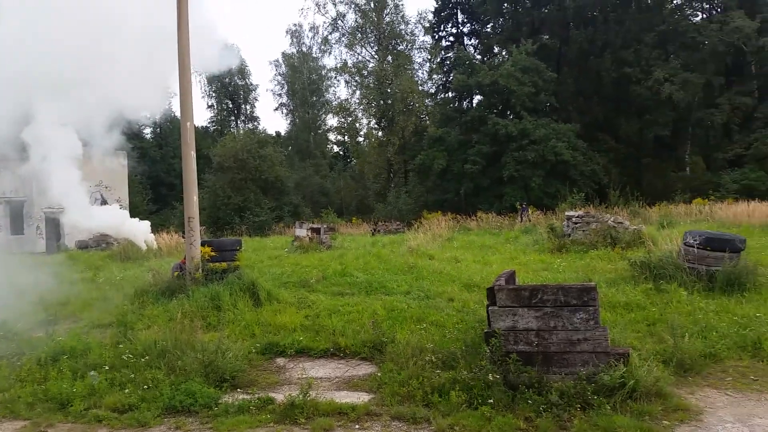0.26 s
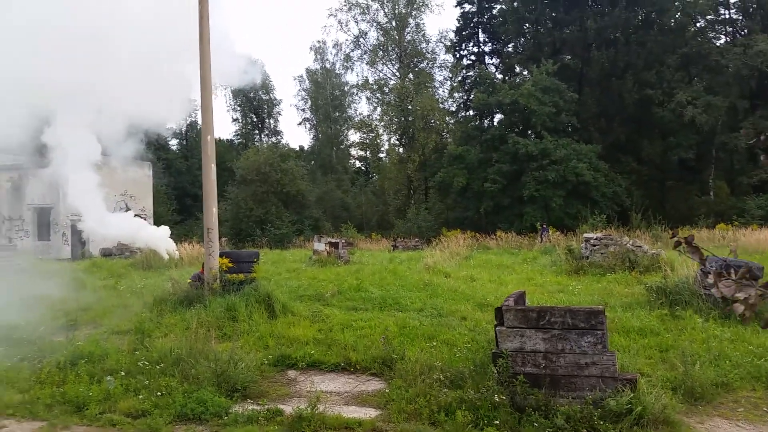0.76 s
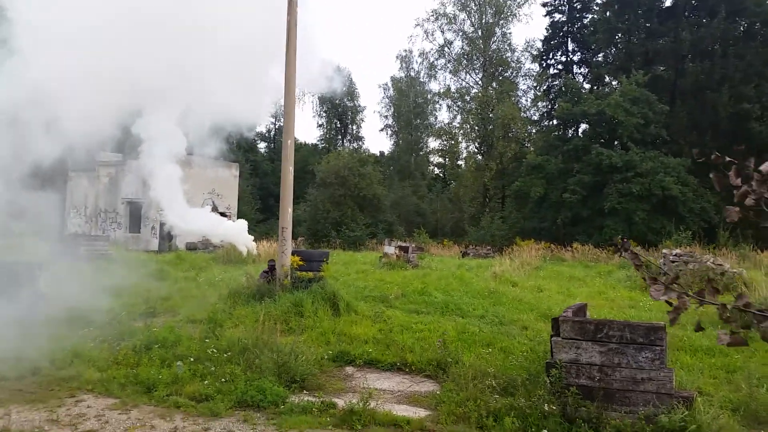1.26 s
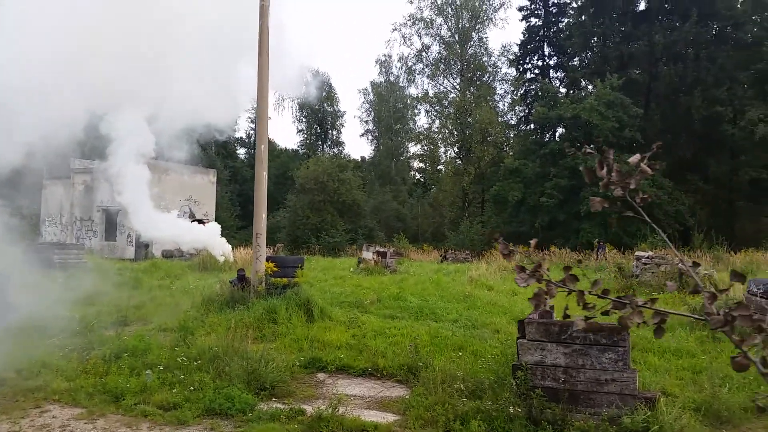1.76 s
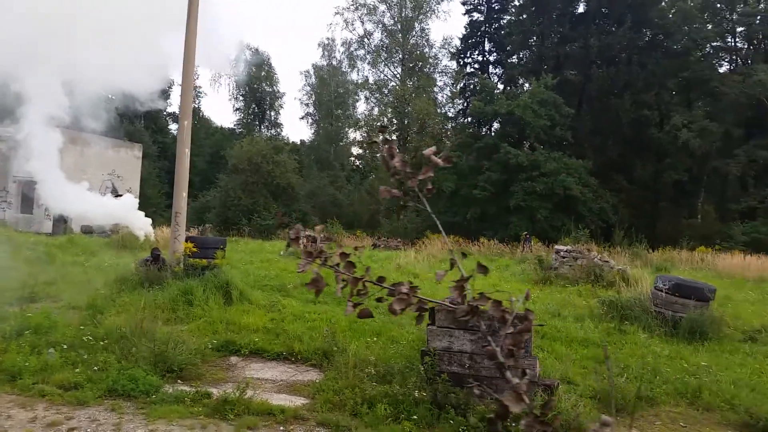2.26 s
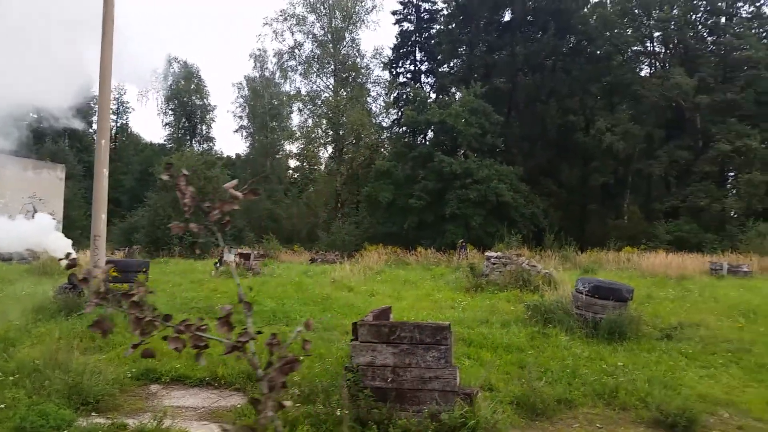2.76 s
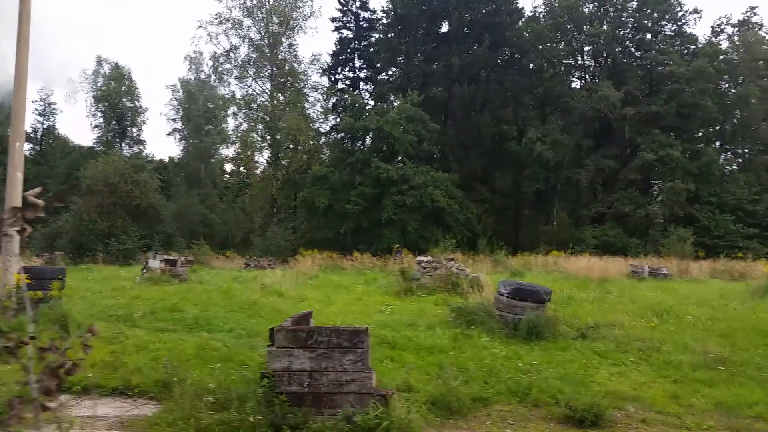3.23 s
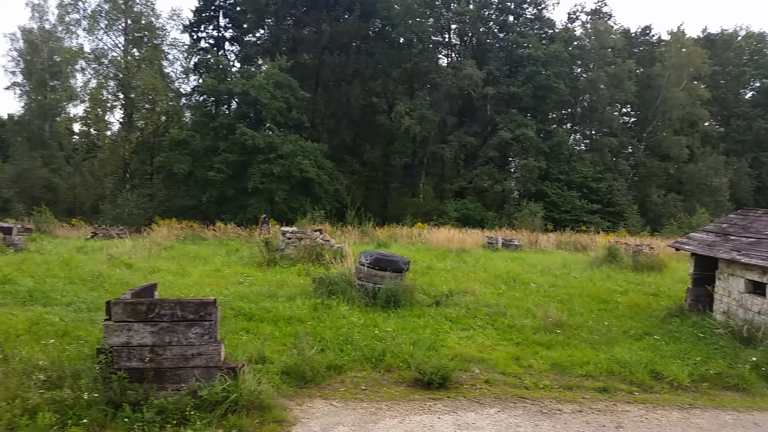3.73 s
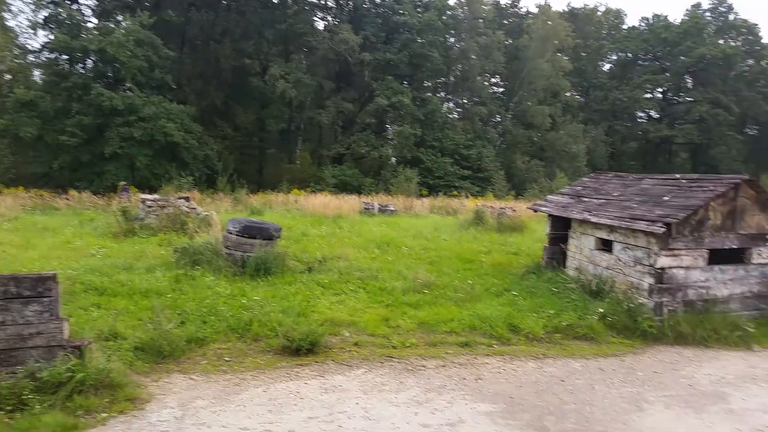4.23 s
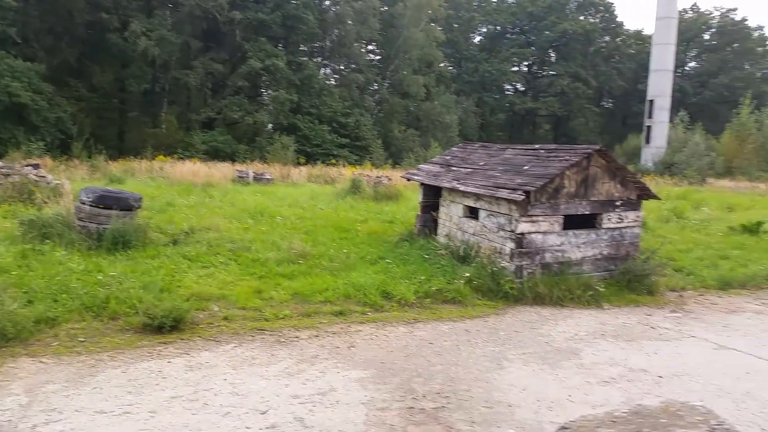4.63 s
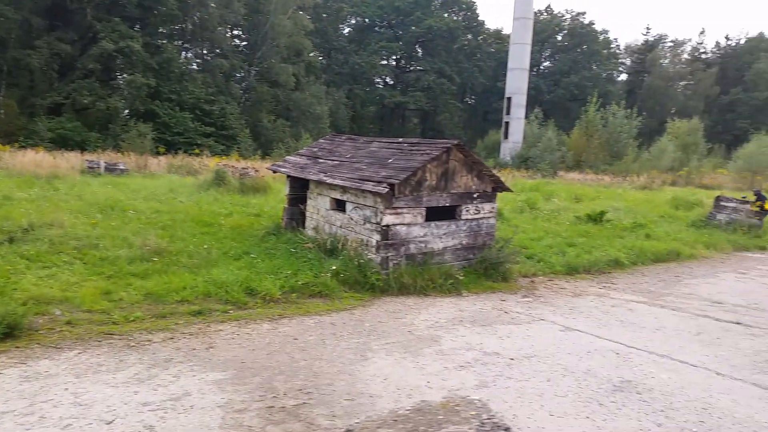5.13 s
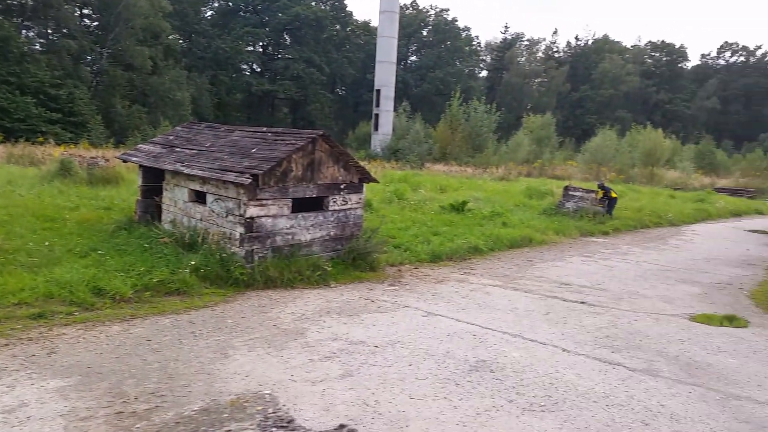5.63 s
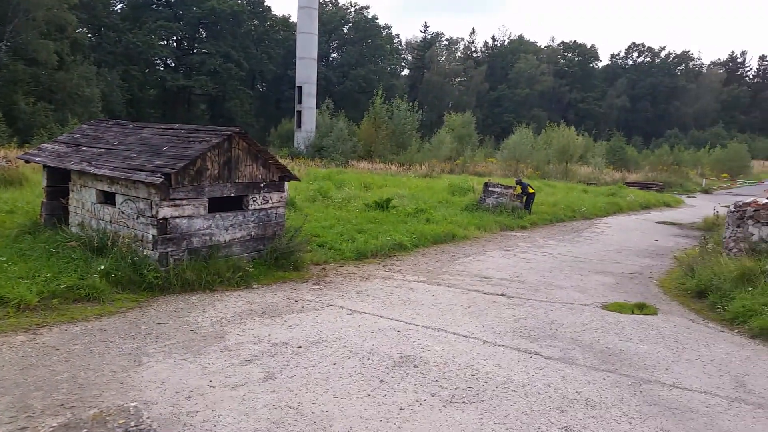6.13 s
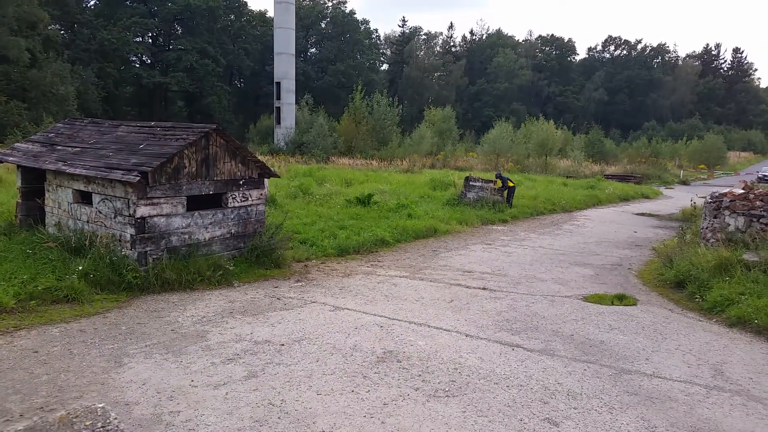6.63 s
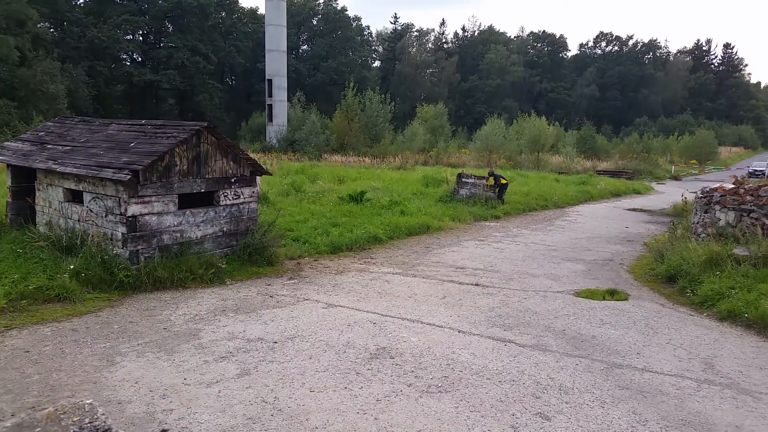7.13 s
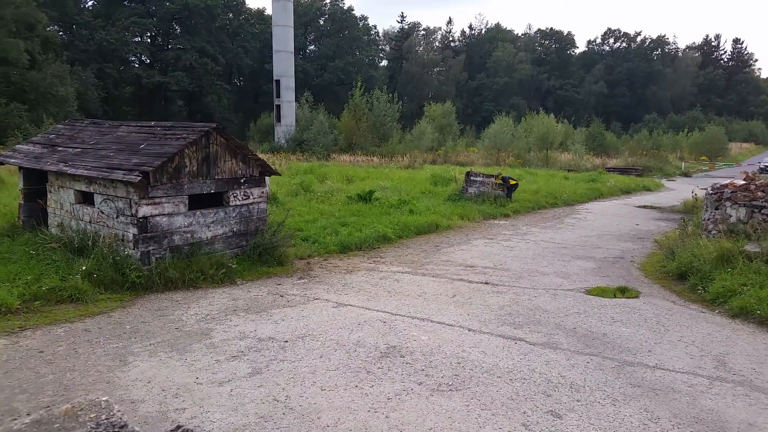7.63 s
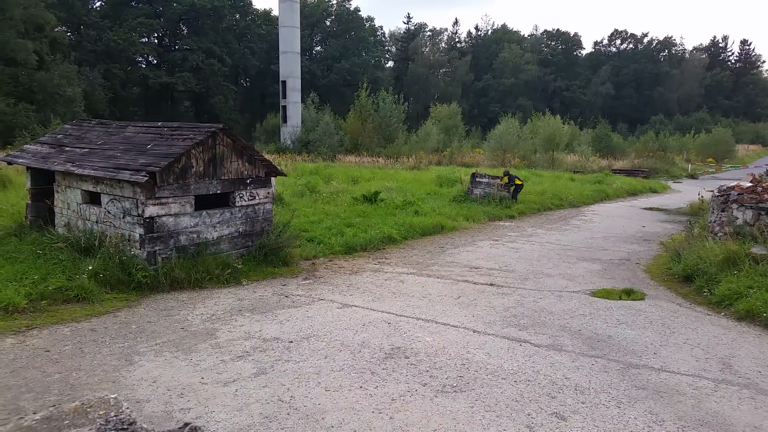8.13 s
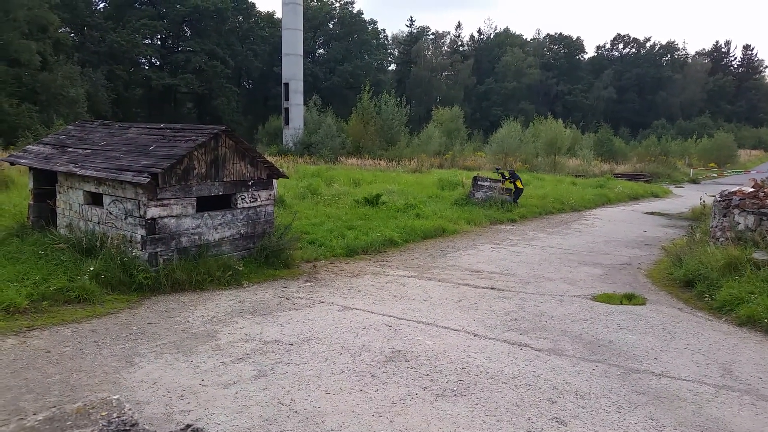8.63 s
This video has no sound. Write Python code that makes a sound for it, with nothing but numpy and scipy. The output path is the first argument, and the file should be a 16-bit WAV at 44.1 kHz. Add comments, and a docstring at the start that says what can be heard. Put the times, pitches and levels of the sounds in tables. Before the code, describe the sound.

Two paintball markers trade irregular sharp pops across an open grassy field, each echoing off huts and forest, over faint wind and hopper rattles.

```python
"""A grassy field ringed by forest, with huts on it: two paintball markers trade shots as a two-port
microphone pans across, so that the shots drift from one port to the other.
A shot is a tiny trigger click, a low push of air, a pop from the barrel and a spit of shaped noise for
the gas; huts and trees throw it back as delayed copies and decaying noise. Between shots, knocks ring
a hopper's modes, twigs tick, feet bump, grass rustles and a light wind rumbles, all from noise and tones."""
import sys
import numpy as np
from scipy import signal
from scipy.fft import rfft, irfft, next_fast_len
from scipy.io import wavfile
from scipy.ndimage import uniform_filter1d

SR = 44100
rng = np.random.default_rng(int(sys.argv[2]) if len(sys.argv) > 2 else 0)


def log_audio(samples):
    """Write samples as a 16-bit WAV file to the path given in sys.argv[1]."""
    # one column per channel
    frames = np.atleast_2d(samples).T
    # limit to full scale, then quantise
    limited = np.clip(frames, -1, 1)
    pcm = np.round(limited * 32767).astype(np.int16)
    wavfile.write(sys.argv[1], SR, pcm)


N = 391608

# Levels are those ahead of the port shading and the microphone's response; spectra are relative.
# low rumble, whose level dips briefly around 7.5 to 8 s: (time [s], level [dB])
RUMBLE_LEVEL = [(0, -49), (.9, -54.5), (2.3, -50), (5.8, -56.5), (7.1, -55), (7.55, -67), (7.98, -65),
                (8.3, -51.5), (8.88, -49.5)]
# background between shots: (time [s], rustle level [dB], murmur level [dB])
BACKGROUND_LEVEL = [(0, -55.5, -48), (.3, -66, -60), (.95, -71, -68), (1.5, -56, -54), (2.1, -61, -59.5),
                    (3.9, -69, -55), (5.3, -71, -72.5), (5.9, -91.5, -71), (7.2, -97, -70.5),
                    (7.6, -95.5, -89), (7.97, -93, -86), (8.3, -75.5, -61)]
# spectra of the wind, the leaves and the far trees: (frequency [Hz], density [dB per Hz])
WIND_SPECTRUM = [(15, -6.5), (35, -7.5), (65, 4.5), (115, 1), (190, -8.5), (300, -14), (600, -24),
                 (2000, -61.5)]
LEAF_SPECTRUM = [(800, -34), (2200, 0.5), (3300, -3.5), (5500, 0), (7050, 6), (8000, -1), (8700, 0),
                 (10500, -2), (12500, -2.5), (15000, -5.5)]
FAR_TREE_SPECTRUM = [(80, -7), (250, 3.5), (430, 4), (650, 5), (1200, -0.5), (2100, -3.5), (2900, -30),
                     (6000, -42.5)]
# one grain of dry stems crackling: (frequency [Hz], level [dB])
CRACKLE_SPECTRUM = [(300, -22), (750, -2.5), (1400, 0.5), (2200, -6.5), (3200, -10), (9000, -32)]
STEMS_RE_MURMUR_DB = -8.5

# small ticks and scuffs of gear and twigs:
# (time [s], level [dB], fade [s], brightness above 1 kHz [dB per octave])
TICKS = [(0.3223, -54, .002, 1), (1.2105, -52, .0022, 1), (1.3565, -36.5, .0025, 5),
         (2.673, -50, .0027, -2), (2.886, -32.5, .006, -2), (3.844, -47, .008, -3.5),
         (4.116, -54, .0022, -2), (5.274, -41, .009, 2), (5.686, -42.5, 0.0019, -0.5)]
# (frequency [Hz], density [dB per Hz])
TICK_SPECTRUM = [(300, -16.5), (1200, 0), (2100, 3), (3100, -8.5), (4500, -3.5), (5700, -3), (7050, 0.5),
                 (9000, -7), (15000, -11.5)]
# soft low bumps of footfalls: (time [s], peak level [dB])
FOOTFALLS = [(0.909, -45), (4.891, -41), (5.175, -30.5), (5.34, -38.5), (6.333, -38.5), (6.384, -41),
             (6.441, -40.5), (7.596, -44)]
# loose balls tumbling in a hopper, a length of 0 being one knock:
# (start [s], length [s], knock level before its random spread [dB], nominal pitch [Hz])
TUMBLES = [(0.818, 0, -49.5, 1260), (2.868, .031, -29.5, 1530), (2.931, 0, -33, 1800),
           (2.956, .034, -29, 1210), (3.029, 0, -42.5, 1000), (3.058, .025, -45, 1600),
           (3.902, 0, -39.5, 1160), (3.949, .027, -40.5, 1250), (4.022, 0, -31.5, 1380),
           (4.036, 0, -41, 1400), (4.088, 0, -40.5, 1560), (5.515, 0, -39.5, 1540), (6.794, 0, -34, 1410),
           (7.73, 0, -76, 1300), (8.009, 0, -52, 1324), (8.562, 0, -43.5, 1140)]
KNOCK_GAP_S, KNOCK_SPREAD_DB = 0.012, 0.5  # within a tumble
# modes of the hopper shell for a 1400 Hz knock, before random detuning:
# (frequency [Hz], relative level [dB], time to fall 60 dB [s])
HOPPER_MODES = [(810, -6.5, 0.013), (1124, -3, 0.01), (1370, 25, 0.009), (1690, 14.5, 0.026),
                (2450, -1, 0.0093)]
# what follows a knock: (frequency [Hz], density [dB per Hz]) and (frequency [Hz], time to fall 60 dB [s])
KNOCK_SCATTER = [(300, -16.5), (1300, 12.5), (2200, -5.5), (4000, -27.5), (12000, -37)]
KNOCK_T60 = [(300, 0.084), (8000, 0.082)]

# the close marker: (time [s], push [dB], body [dB], pop [dB], gas [dB], gas brightness above 1 kHz
# [dB per octave], near scatter [dB], boom [dB], forest echo [dB], leaf echo [dB], left port lag [ms])
SPITTING_SHOTS = [(1.5445, -28, -29, -17.5, -25, -0.5, -31, -46, -30.5, -46, 0.45),
                  (2.1933, -26, -31.5, -22.5, -26, -4, -33, -46, -33, -48.5, 0.41),
                  (2.772, -25, -29.5, -20.5, -27, -1.5, -32.5, -43, -33.5, -53, 0.43),
                  (3.367, -29.5, -39, -21.5, -25.5, -3, -32, -60, -31.5, -63, 0.39),
                  (4.2182, -41, -35, -25, -21.5, -3, -31.5, -52, -35, -58, 0.35),
                  (4.425, -34.5, -43, -49, -28, 1, -44, -56, -37, -65.5, -0.35),
                  (6.761, -35.5, -31.5, -55.5, -34.5, -4.5, -41.5, -54.5, -51, -71.5, -0.43),
                  (7.205, -48, -35.5, -47, -35, -4, -48, -57.5, -69.5, -88, -0.44),
                  (8.127, -32, -35.5, -55, -43, -3.5, -47, -49.5, -48.5, -65.5, -0.45),
                  (8.611, -29.5, -27.5, -54, -32, -4.5, -41, -43, -43, -65.5, -0.43)]
# the second marker: (time [s], push [dB], pop [dB], gas [dB], gas brightness above 1 kHz
# [dB per octave], near scatter [dB], boom [dB], forest echo [dB], leaf echo [dB], left port lag [ms])
BARKING_SHOTS = [(4.1578, -30.5, -18, -25, -0.5, -27.5, -40, -42, -61, 0.19),
                 (4.5604, -40, -19, -19.5, -0.5, -26.5, -44, -39.5, -68, 0.09),
                 (4.983, -35.5, -23, -25, -1, -30.5, -44, -43.5, -67, 0.0),
                 (5.4181, -36, -23.5, -24.5, -2, -34, -46.5, -45.5, -73, -0.1),
                 (6.007, -30.5, -22, -33, -1.5, -37, -38, -60, -68, -0.172),
                 (6.5586, -36, -22.5, -31, -4, -37.5, -42, -60, -69, -0.36),
                 (7.023, -31, -20.5, -34.5, 2, -34.5, -35.5, -58, -76, -0.403)]
# spectra of the gas jets: (frequency [Hz], density [dB per Hz])
SPITTING_GAS = [(400, -8.5), (900, -9), (1500, 0.5), (2250, -3), (3100, -9), (4500, -4), (5800, -9.5),
                (7100, -4.5), (9500, -7), (12500, -14), (15000, -6.5)]
BARKING_GAS = [(400, -17), (900, -1.5), (1350, -2.5), (2100, -6.5), (3000, -12.5), (4800, -7.5),
               (5900, -13.5), (7100, -9), (9500, -16), (15000, -21.5)]
# overtones of the second marker's barrel: (frequency [Hz], level against the pop [dB])
BARREL_OVERTONES = [(830, -7), (1350, -7), (1680, -24)]
# spectra of the scatter from huts and bushes, the forest echo and the low roll between the buildings:
# (frequency [Hz], density [dB per Hz])
SPITTING_SCATTER = [(40, -4.5), (100, 21), (200, -3), (330, 10), (600, 4.5), (1100, 4.5), (2100, 0.5),
                    (3100, -3), (5500, -4.5), (7100, -2.5), (9500, -6), (14500, -10)]
BARKING_SCATTER = [(40, -2), (110, 8), (180, 15), (330, 7), (520, 11.5), (760, 1), (950, 9.5), (1300, 2.5),
                   (1700, 4), (3100, -4.5), (5500, -5.5), (7200, -6.5), (9500, -8), (14500, -12)]
FOREST_SPECTRUM = [(40, -16.5), (105, 8.5), (240, -2), (430, 3), (680, 6.5), (1300, 2.5), (2100, 2),
                   (3100, -3.5), (5600, -2.5), (7000, -3), (9600, -4.5), (12600, -17.5), (15000, -22.5)]
BOOM_SPECTRUM = [(40, -27), (100, -8), (175, -3.5), (290, -6.5), (400, -8), (800, -33.5), (3000, -74)]
# how long these ring: (frequency [Hz], time to fall 60 dB [s])
SCATTER_T60 = [(100, 0.4), (250, .45), (600, 0.27), (2000, 0.37), (7000, 0.39), (14000, 0.19)]
FOREST_T60 = [(100, 0.73), (600, 0.99), (2000, 1.127), (7000, 0.69), (14000, 0.3)]
BOOM_T60 = [(150, 0.76), (400, 0.12)]
# planks returning the second marker's pop: (delay before a small jitter [s], level [dB])
PLANK_ECHOES = [(.0165, -16.5), (.0232, -7.5), (.0305, -13.5), (.04, -21), (.061, -28)]
WALL_S, WALL_DB = .019, -3.5  # a building's echo of the second marker's push
# the tree line answers every shot: leaves return its hiss, trunks its low push as a dull roll
TREE_LINE_S, TREE_SWELL_S = 0.15, 0.11  # delay of the echo's crest, and time constant of its swell
LEAF_FALL_DB_PER_S, ROLL_FALL_DB_PER_S = 76, 51
ROLL_RE_PUSH_DB = -25.5

# resonances of the microphone's ducts: (frequency [Hz], width [Hz], level [dB])
PORT_MODES = [(2150, 280, 3.5), (3730, 220, 4), (7050, 380, 5), (8680, 260, 4), (11800, 600, 3)]
# colour of the two ports: (frequency [Hz], left minus right [dB])
PORT_BALANCE = [(60, 1.3), (250, 1.5), (900, 2), (2000, 2.5), (4500, -3.5), (9000, 0)]
PORTS_APART_S = 0.00052  # sound's travel time between the ports
EDGE_HZ = 14700  # the recorder's band limit


def amp(db):
    """Decibels to gain."""
    return 10 ** (np.asarray(db) / 20)


def unit(x):
    """Scales to an rms of 1."""
    return x / np.sqrt(np.mean(x ** 2) + 1e-20)


def over(x, seconds):
    """Scales a short sound so that its energy equals an rms of 1 held this long."""
    return x * np.sqrt(seconds * SR / (np.sum(x ** 2) + 1e-20))


def read(points, hz):
    """Reads a table on a log-frequency axis."""
    f, value = np.transpose(points)
    return np.interp(np.log(hz + 1), np.log(f + 1), value)


def level(curve, column=1):
    """The gain over time of one dB column of a curve."""
    columns = np.transpose(curve)
    return amp(np.interp(np.arange(N) / SR, columns[0], columns[column]))


def add(mix, s, sound):
    """Mixes a sound in at time s."""
    start = max(round(s * SR), 0)
    part = mix[:, start:][:, :sound.shape[-1]]
    part += sound[..., :part.shape[1]]


def colour(x, points, tilt_db=0):
    """Causal filter with the given spectrum, tilted above 1 kHz by dB per octave."""
    hz = abs(np.fft.fftfreq(len(x), 1 / SR))
    tilt = tilt_db * np.log2(np.maximum(hz, 1000) / 1000)
    log_gain = np.log(amp(read(points, hz) + tilt))
    # the Hilbert transform of the log gain gives the minimum phase
    response = np.exp(signal.hilbert(log_gain).conj())
    return np.fft.ifft(np.fft.fft(x) * response).real


def ports(x, lag_ms, shade_db=6.0):
    """The far port hears a sound later and duller, shaded by the housing; the near one is brighter."""
    hz = np.fft.rfftfreq(len(x), 1 / SR)
    side = np.array([[1], [-1]])  # each port takes half the lag
    shadow_db = -side * shade_db * lag_ms * hz / (hz + 2500)
    delay = np.exp(-1j * np.pi * hz * side * lag_ms / 1000)
    return irfft(rfft(x) * amp(shadow_db) * delay, len(x))


def diffuse(count, points, t60=None, patchy_db=3.0, size=512, flicker_db=1.03):
    """Noise from all around: alike at both ports in the bass, patchy and flickering, dying by band if t60."""
    hop = size // 4
    hz = np.fft.rfftfreq(size, 1 / SR)
    t = np.arange(count // hop + 5)[:, None] * hop / SR
    a, b, c, d, patches = np.moveaxis(rng.standard_normal((len(t), len(hz), 5)), 2, 0)
    # a diffuse field correlates two spaced ports as a sinc
    same = np.sinc(2 * hz * PORTS_APART_S)
    left = a + 1j * b
    right = same * left + np.sqrt(1 - same ** 2) * (c + 1j * d)
    # single reflectors and gusts stand out briefly across the lower bands
    flicker = unit(uniform_filter1d(rng.standard_normal(t.shape), size=4, axis=0)) / (1 + hz / 4000)
    patches = uniform_filter1d(patches, size=9, axis=0)
    patches = unit(uniform_filter1d(patches, size=4, axis=1))
    gain_db = read(points, hz) + patchy_db * patches + flicker_db * flicker
    z = np.array([left, right]) * amp(gain_db)
    # sets the overall level, whatever the spectrum
    z = z / np.sqrt(np.sum(amp(read(points, hz)) ** 2)) * np.sqrt(3 / 2)
    if t60:
        z = z * amp(-60 * t / read(t60, hz))
    return signal.istft(z.swapaxes(1, 2), nperseg=size, noverlap=size - hop)[1][:, :count]


def swing(t, hz, rise):
    """A pressure swing that builds for `rise` seconds and dies within a few cycles."""
    u = np.maximum(t, 0) / rise
    return u ** 2 * np.exp(-2 * u) * np.sin(2 * np.pi * hz * t)


def wind():
    """A low rumble of noise, and eddies that brush each port separately."""
    lowpass = signal.butter(2, 55, fs=SR, output="sos")
    eddies = unit(signal.sosfilt(lowpass, rng.standard_normal((2, N))))
    rumble = diffuse(N, WIND_SPECTRUM, patchy_db=0.0, size=2048)
    return (rumble + eddies * amp(-0.5)) * level(RUMBLE_LEVEL)


def crackle(per_s=120, spread_db=2.5):
    """Dry stems and leaves crackle: coloured grains of random size at random times."""
    sizes = amp(spread_db * np.minimum(rng.exponential(1, (2, N)), 4))
    sizes = sizes * (rng.random((2, N)) < per_s / SR)
    grain = colour(signal.unit_impulse(1024), CRACKLE_SPECTRUM)
    return unit(signal.oaconvolve(sizes, grain[None])[:, :N])


def tree_line(hits, fall_db_per_s):
    """Gain over time of the tree line's answer to (s, dB) hits: each swells to a crest, then dies evenly."""
    power = np.zeros((1, N))
    late = np.arange(SR * 3 // 2) / SR - TREE_LINE_S
    swell = np.exp(-(np.minimum(late, 0) / TREE_SWELL_S) ** 2)
    echo = swell * amp(-fall_db_per_s * np.maximum(late, 0))
    for s, db in hits:
        add(power, s, (amp(db) * echo) ** 2)
    return np.sqrt(power)


def field():
    """Leaves rustle and the far trees murmur as noise; both swell as the tree line returns each shot."""
    shots = SPITTING_SHOTS + BARKING_SHOTS
    leaf_hits = [(s, leaf_db) for s, *_, leaf_db, lag_ms in shots]
    trunk_hits = [(s, push_db + ROLL_RE_PUSH_DB) for s, push_db, *_ in shots]
    hiss = tree_line(leaf_hits, LEAF_FALL_DB_PER_S)
    roll = tree_line(trunk_hits, ROLL_FALL_DB_PER_S)
    leaves = diffuse(N, LEAF_SPECTRUM, patchy_db=2.5)
    trees = diffuse(N, FAR_TREE_SPECTRUM, patchy_db=3.0) + crackle() * amp(STEMS_RE_MURMUR_DB)
    rustle = leaves * np.hypot(level(BACKGROUND_LEVEL), hiss)
    murmur = trees * np.hypot(level(BACKGROUND_LEVEL, column=2), roll)
    return rustle + murmur


def tick(fade=0.0013, tilt_db=0):
    """A tiny click: a coloured noise burst that starts at once and fades in milliseconds."""
    t = (np.arange(2048) - 64) / SR
    burst = rng.standard_normal(len(t)) * (t >= 0) * np.exp(-abs(t) / fade)
    return over(colour(burst, TICK_SPECTRUM, tilt_db), 0.0035)


def knock(hz, contact=0.0021, spread=.08):
    """A ball chatters against the hopper shell for a few milliseconds and rings its modes."""
    t = np.arange(2048) / SR
    shell = np.zeros(len(t))
    for mode_hz, mode_db, t60 in HOPPER_MODES:
        detuned_hz = mode_hz * (hz / 1400) ** .5 * (1 + spread * rng.uniform(-1.57, 1))
        shell += amp(mode_db - 60 * t / t60) * np.sin(2 * np.pi * detuned_hz * t)
    chatter = rng.standard_normal(len(t)) * np.exp(-((t - .003) / contact) ** 2)
    ring = signal.fftconvolve(chatter, shell)[:len(t)]
    # the soft ball cannot excite much above twice the knock's pitch
    softness = signal.butter(3, min(2.3 * hz, 8000), fs=SR, output="sos")
    return over(signal.sosfilt(softness, ring), 0.0029)


def small_sounds():
    """Twigs and gear tick; balls tumble in the hopper in short runs of knocks; feet bump the ground."""
    mix, t = np.zeros((2, N)), np.arange(4096) / SR
    for s, db, fade, tilt_db in TICKS:
        add(mix, s, ports(tick(fade, tilt_db), rng.uniform(-0.293, 0.27)) * amp(db))
    for start, length, db, hz in TUMBLES:
        count = 1 + round(abs(length) / KNOCK_GAP_S)
        for s in np.linspace(start, start + length, count):
            knock_db = db + KNOCK_SPREAD_DB * rng.uniform(-0.84, 1)
            add(mix, s, ports(knock(hz), 0.06) * amp(knock_db))
            add(mix, s + 0.0067, diffuse(len(t), KNOCK_SCATTER, KNOCK_T60) * amp(db - 11.5))
    bump = swing(t, hz=89, rise=0.0084)
    for s, db in FOOTFALLS:
        add(mix, s, ports(bump / abs(bump).max(), 0) * amp(db))
    return mix


def gas(t, points, tilt_db, hold, fade, shock, exit_s):
    """Gas hisses for milliseconds, with a shock as the valve opens and an opposite one as the ball leaves."""
    jet = rng.standard_normal(len(t)) * (t >= 0) * np.exp(-np.maximum(t - hold, 0) / fade)
    jet[np.argmax(t >= 0)] += shock
    jet[np.argmax(t >= exit_s * rng.uniform(.85, 1.15))] -= shock
    return over(colour(jet, points, tilt_db), 0.013)


def pop(t, hz, ring, gap, second):
    """The barrel rings briefly, and again as a second puff follows the ball."""
    def blow(u):
        return (u >= 0) * np.exp(-abs(u) / ring) * np.sin(2 * np.pi * hz * u)
    return over(blow(t) + second * blow(t - gap), 0.0047)


def surroundings(mix, s, scatter, near_db, boom_db, far_db, near_rise, far_rise):
    """Nearby huts and bushes answer at once, bass rolls between buildings, and the forest edge swells later."""
    t = np.arange(SR * 3 // 5) / SR
    near = diffuse(len(t), scatter, SCATTER_T60) * (1 - np.exp(-t / near_rise))
    add(mix, s + .006, amp(near_db) * near)
    boom = diffuse(len(t), BOOM_SPECTRUM, BOOM_T60, size=1024) * (1 - np.exp(-t / 0.0092))
    add(mix, s + 0.022, amp(boom_db) * boom)
    t = np.arange(SR * 5 // 4) / SR
    far = diffuse(len(t), FOREST_SPECTRUM, FOREST_T60, patchy_db=2.5)
    add(mix, s + 0.046, amp(far_db) * far * (1 - np.exp(-(t / far_rise) ** 2)))


def spitting_marker():
    """The close marker: a round push of air under a sharp spit of gas, after a trigger click."""
    mix, lead = np.zeros((2, N)), 128 / SR  # silence ahead of each shot's onset
    t = np.arange(4096) / SR - lead
    for (s, push_db, body_db, pop_db, gas_db, tilt_db,
         near_db, boom_db, far_db, _, lag_ms) in SPITTING_SHOTS:
        push = -over(swing(t, hz=109, rise=0.0046), 0.0087) * amp(push_db)
        barrel = pop(t, hz=964, ring=.0016, gap=.0021, second=1.0) * amp(pop_db)
        body = pop(t, hz=320, ring=0.0063, gap=0.0036, second=0.95) * amp(body_db)
        jet = gas(t, SPITTING_GAS, tilt_db, hold=0.0043, fade=.0013, shock=1.8, exit_s=0.0041)
        jet = jet * amp(gas_db)
        add(mix, s - lead, ports(push + barrel + body + jet, lag_ms, shade_db=6.5))
        add(mix, s - .0185, ports(tick(fade=0.0026), lag_ms) * amp(gas_db - 21))
        surroundings(mix, s, SPITTING_SCATTER, near_db, boom_db, far_db, near_rise=.003, far_rise=0.18)
    return mix


def barking_marker():
    """The second marker has a hollow, lower-pitched pop, which nearby walls slap back with less hiss."""
    mix, lead = np.zeros((2, N)), 128 / SR  # silence ahead of each shot's onset
    t = np.arange(4096) / SR - lead
    for (s, push_db, pop_db, gas_db, tilt_db,
         near_db, boom_db, far_db, _, lag_ms) in BARKING_SHOTS:
        push = -over(swing(t, hz=128, rise=0.005), 0.018) * amp(push_db)
        barrel = pop(t, hz=636, ring=0.0014, gap=.0016, second=1.0) * amp(pop_db)
        overtone = sum(pop(t, hz=hz, ring=0.0042, gap=0.0013, second=0.22) * amp(pop_db + db)
                       for hz, db in BARREL_OVERTONES)
        jet = gas(t - .0005, BARKING_GAS, tilt_db, hold=0.0043, fade=0.0013, shock=4, exit_s=0.003)
        jet = jet * amp(gas_db)
        add(mix, s - lead, ports(push + barrel + overtone + jet, lag_ms, shade_db=13.5))
        # planks return the pop as a short train, which rings near one pitch
        slap = pop(t, hz=560, ring=0.0022, gap=.0019, second=0.93) * amp(pop_db)
        slap = slap + .5 * overtone + 0.53 * jet
        for delay, echo_db in PLANK_ECHOES:
            arrival = s - lead + delay + rng.normal(0, 0.0004)
            add(mix, arrival, ports(slap, rng.uniform(-0.059, 0.2)) * amp(echo_db))
        # only a broad wall returns the low push
        add(mix, s - lead + WALL_S, ports(push, 0) * amp(WALL_DB))
        add(mix, s - .0195, ports(tick(fade=.003), lag_ms) * amp(gas_db - 32))
        surroundings(mix, s, BARKING_SCATTER, near_db, boom_db, far_db, near_rise=0.0026, far_rise=0.14)
    return mix


def microphone(x):
    """Each port has its own colour, both have duct resonances; a bass cut thins the deepest rumble."""
    size = next_fast_len(N + 4096)
    hz = np.fft.rfftfreq(size, 1 / SR)
    ducts = 1 + sum((amp(db) - 1) / (1 + 2j * (hz - f) / width) for f, width, db in PORT_MODES)
    balance = amp(np.array([[.5], [-.5]]) * read(PORT_BALANCE, hz))
    heard = irfft(rfft(x, size) * ducts * balance, size)[:, :N]
    bass_cut = signal.butter(2, 50, "highpass", fs=SR, output="sos")
    return signal.sosfilt(bass_cut, heard)


def scene():
    """The wind, the open field, the small sounds and both markers."""
    return wind() + field() + small_sounds() + spitting_marker() + barking_marker()


def record(dry):
    """The microphone, then the recorder's band limit."""
    band_limit = signal.firwin(255, EDGE_HZ, window=("kaiser", 8), fs=SR)
    return signal.oaconvolve(microphone(dry), band_limit[None], "same")


dry = scene()
out = record(dry)
log_audio(out)
```